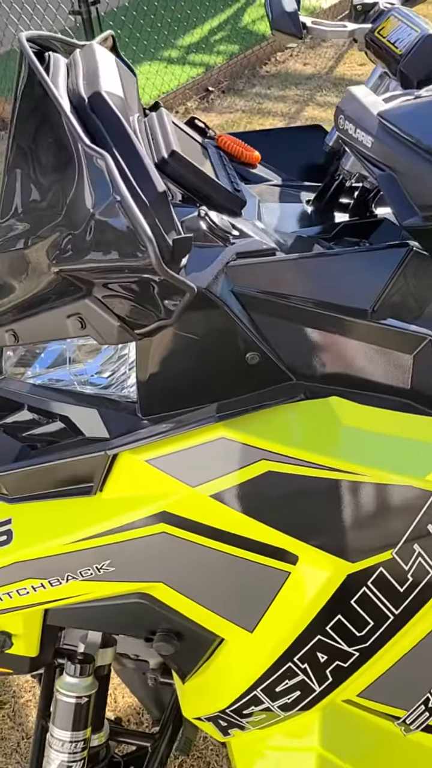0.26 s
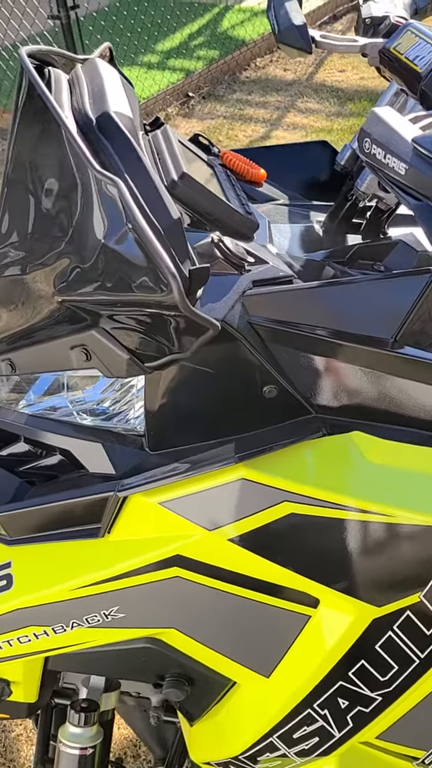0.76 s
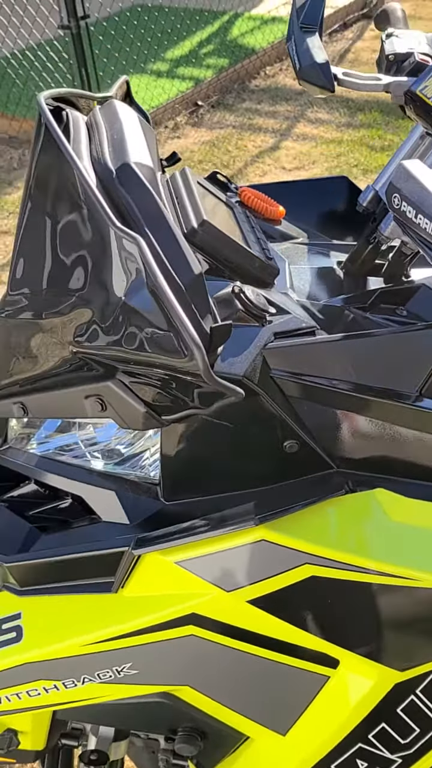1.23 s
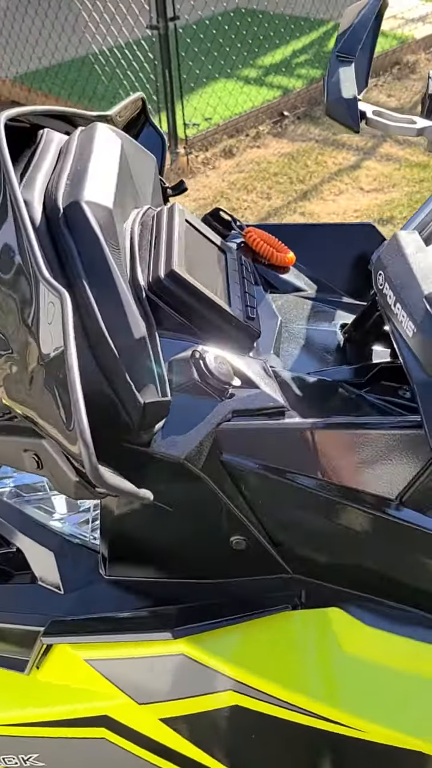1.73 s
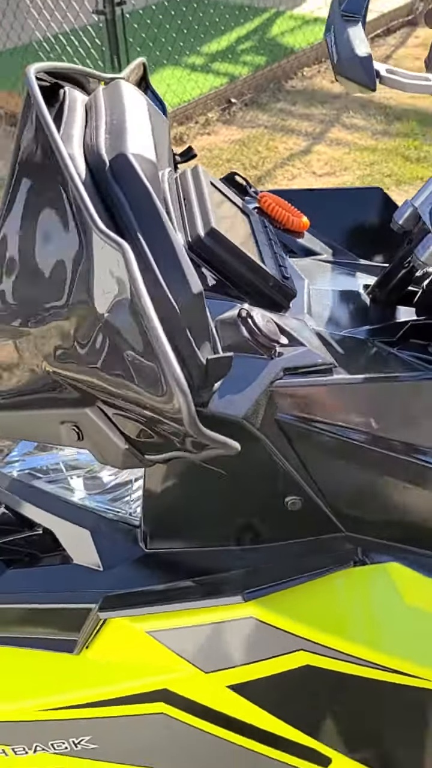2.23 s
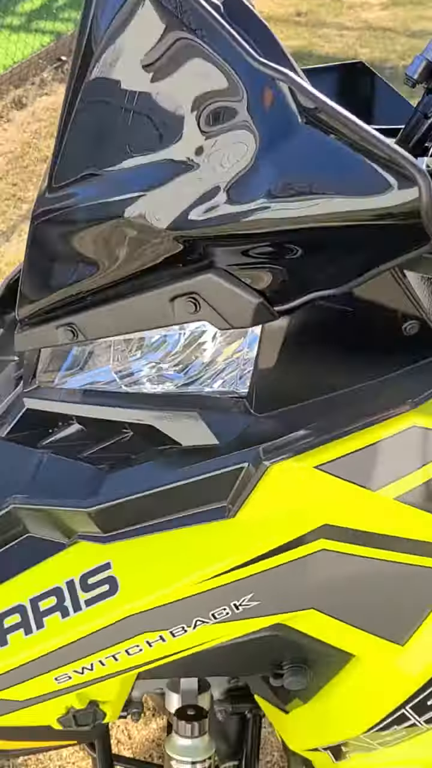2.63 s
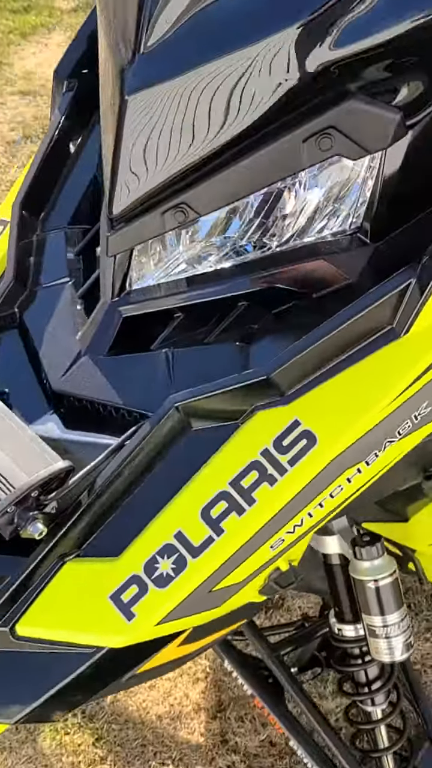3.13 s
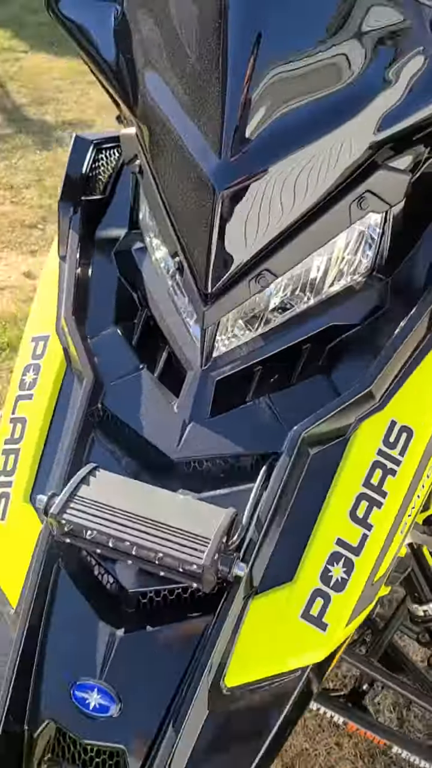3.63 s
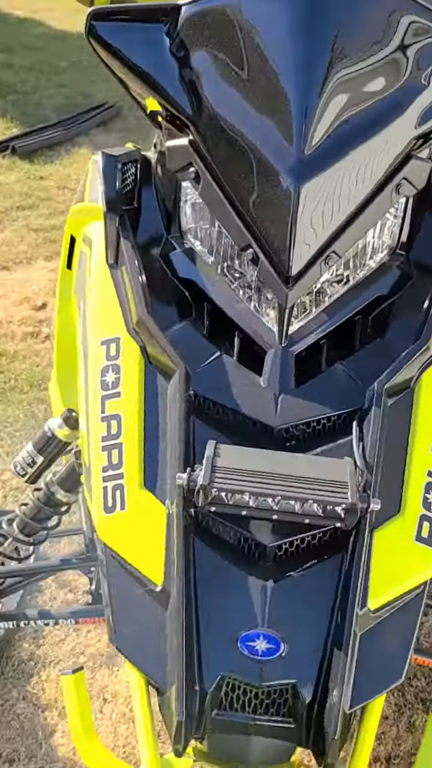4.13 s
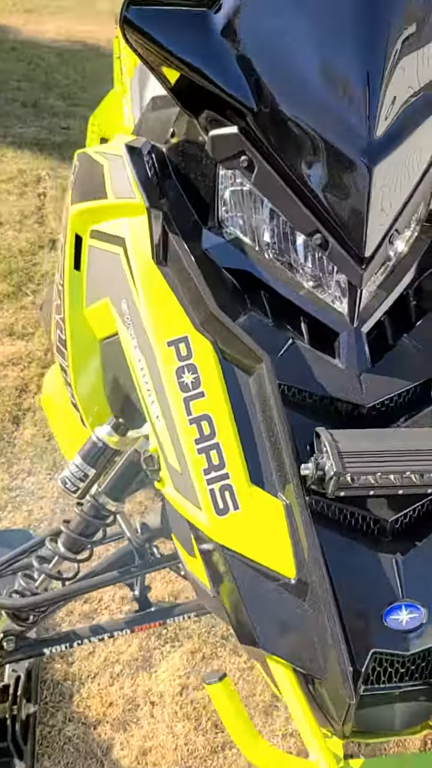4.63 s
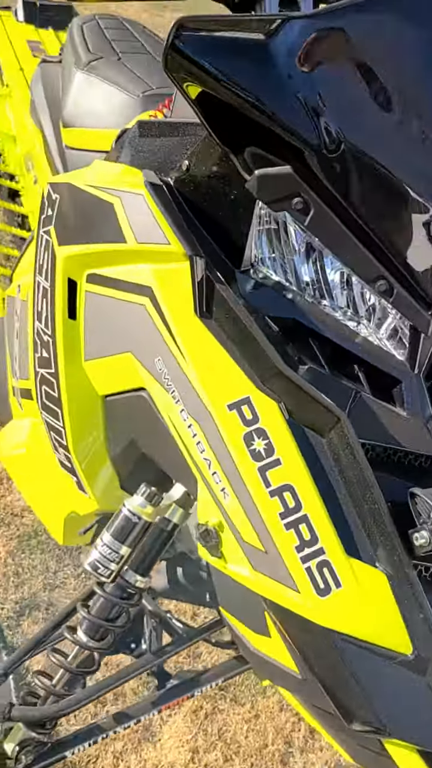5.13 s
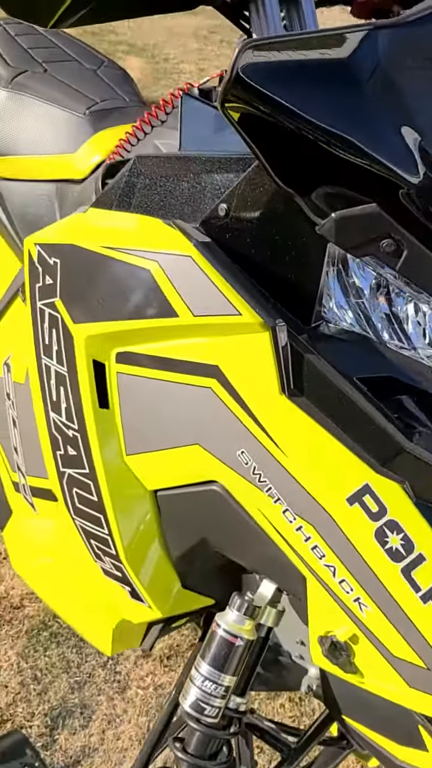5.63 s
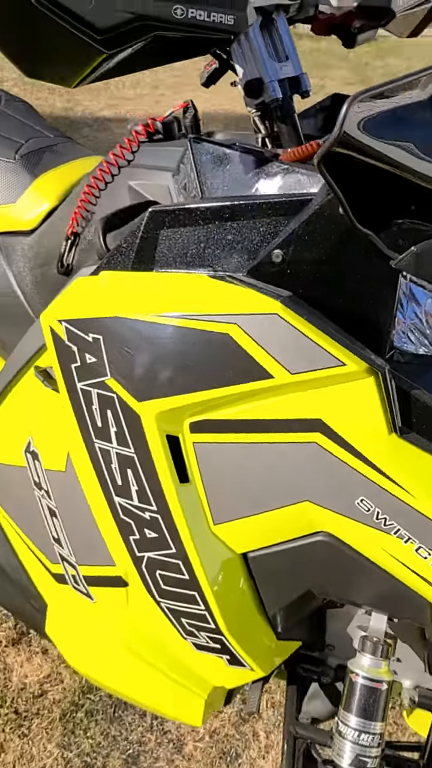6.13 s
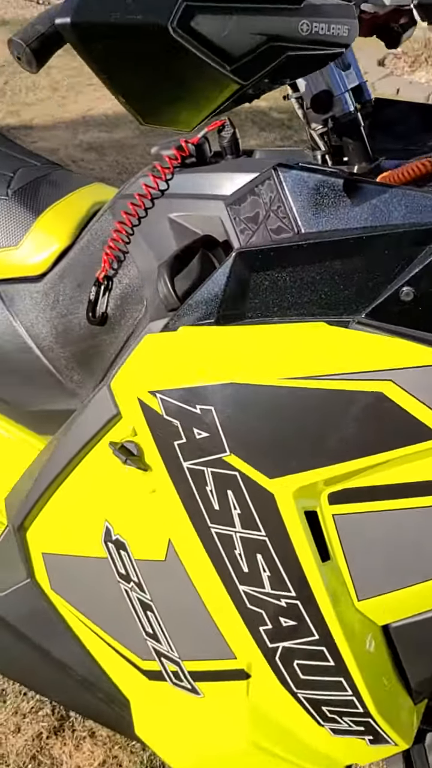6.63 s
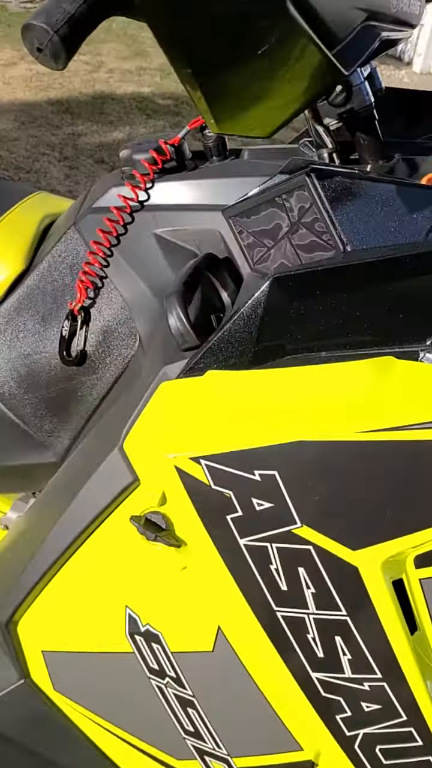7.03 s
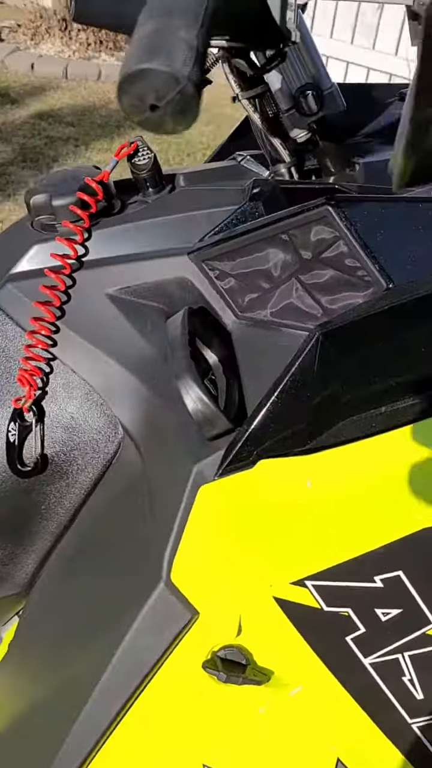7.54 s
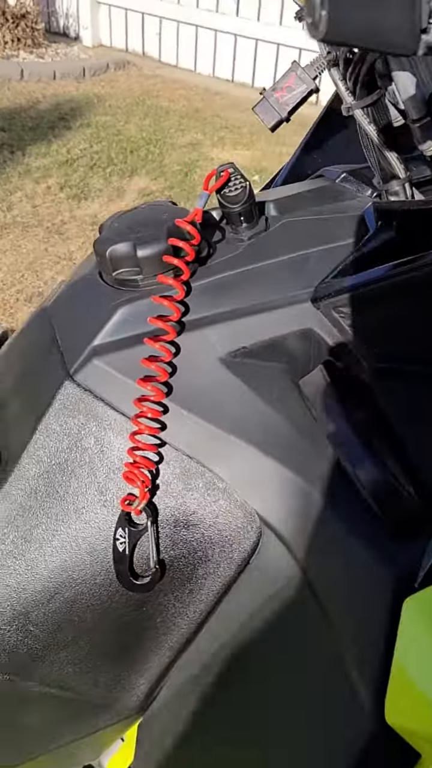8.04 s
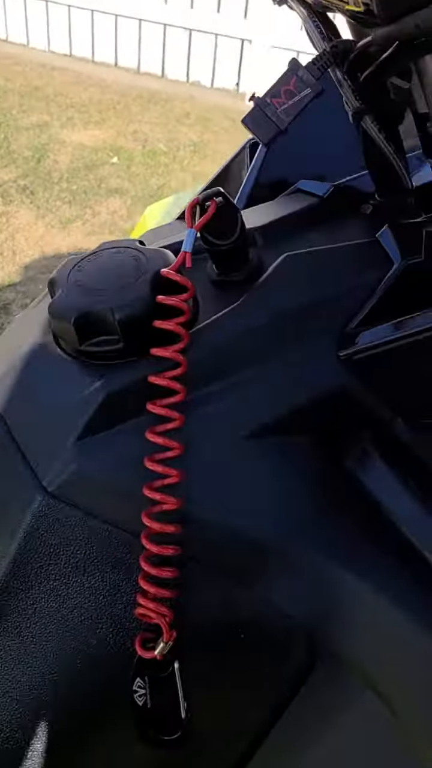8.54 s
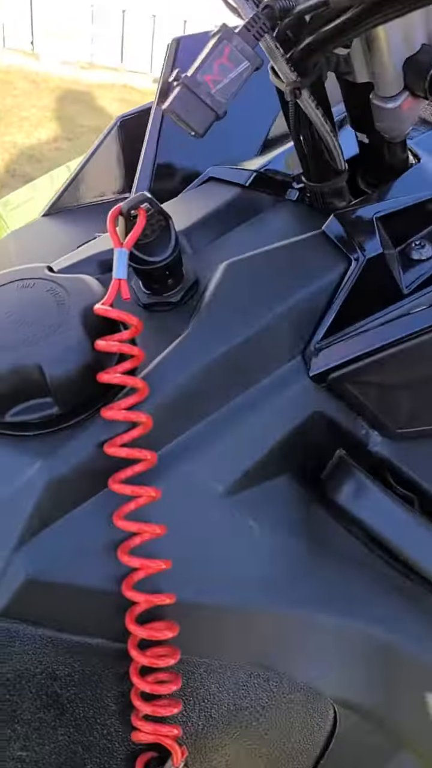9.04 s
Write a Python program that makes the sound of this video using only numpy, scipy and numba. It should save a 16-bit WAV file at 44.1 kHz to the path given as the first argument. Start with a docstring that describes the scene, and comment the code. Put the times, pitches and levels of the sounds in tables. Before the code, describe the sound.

Continuous close stereo sound of a snowmobile engine idling outdoors without revving. Uneven firing gives a lumpy, sputtering pop-pop over a droning exhaust hum, with hollow metallic ringing, fast intake knocks, gas hiss and rattling bodywork. As the microphone passes the front, knocks harden and hiss sharpens; later the sound turns duller and rounder, still idling when it cuts off.

```python
"""Snowmobile idling on grass

A two-cylinder two-stroke idles on grass while a stereo microphone is carried close round its nose.
The pistons pump the exhaust pipe into a steady hum; only some strokes fire, each with a pop, a puff of
hiss and a short collapse of the hum. The intake knocks once a turn, now hard, now airy; gas hisses and
whistles, and the engine bay rumbles and rattles behind it all. The walk is heard as slow changes of level.
"""
import sys
import numpy as np
from scipy import signal
from scipy.io import wavfile
from numba import njit

SR = 44100
rng = np.random.default_rng(int(sys.argv[2]) if len(sys.argv) > 2 else 0)


def transcribe(signal):
    """Save signal, clipped to [-1, 1], as a 16-bit WAV file at the path in sys.argv[1]."""
    frames = np.atleast_2d(signal).T
    limited = np.clip(frames, -1, 1)
    pcm = np.round(limited * 32767).astype(np.int16)
    wavfile.write(sys.argv[1], SR, pcm)


N = 408807

# Strokes that fire, with relative strengths: start_s, pop_db, puff_db (hiss), crack_db
FIRINGS = [(0.0789, 1.5, -34, -28), (0.1254, 4.5, -28.5, -22), (0.1992, 0.5, -36, -29),
           (0.2732, 3, -28.5, -26), (0.3179, -1, -35, -33), (0.3949, -13, -38, -23), (0.425, 3, -29.5, -19),
           (0.441, 0.5, -37, -31), (0.5471, -4, -27, -23), (0.5634, -2, -51, -40), (0.5948, -4, -41, -42),
           (0.643, -9, -32.5, -22), (0.689, -9, -42, -26), (0.7213, -4, -42, -36),
           (0.7378, 3.5, -28, -19.5), (0.784, -6, -43, -39), (0.8609, 1.5, -26.5, -27),
           (0.8766, -1.5, -45, -41), (0.9068, -4, -43, -40), (0.9834, -1, -26, -24), (1.031, 5.5, -29, -27),
           (1.0756, 1, -29.5, -34), (1.1529, -2.5, -35, -21), (1.199, 2, -26.5, -19.5),
           (1.2443, -1, -38, -36), (1.3188, 0.5, -28.5, -34), (1.3964, 4, -31.5, -26),
           (1.4119, -13, -36, -24), (1.4409, 2.5, -29, -27), (1.5456, 0.5, -37, -26),
           (1.5618, -7, -40, -26), (1.5909, -1, -31, -36), (1.6374, 1.5, -34, -20), (1.7394, 1, -28, -23),
           (1.7868, 0, -30, -25), (1.8297, -5, -33, -35), (1.935, 0, -29, -22), (1.95, 1.5, -30.5, -20),
           (2.0543, -10, -39, -23), (2.083, -22, -42, -37), (2.0993, -1.5, -24.5, -18),
           (2.2039, -4, -47, -26), (2.2504, -5, -26.5, -24), (2.2932, 2.5, -29.5, -25),
           (2.3668, -5, -32, -42), (2.3966, -5, -44, -38), (2.4434, -6, -42, -28), (2.488, -1, -27.5, -24),
           (2.5326, -0.5, -34, -16.5), (2.576, 3, -27.5, -18), (2.709, 5.5, -28, -37),
           (2.725, -4, -27, -18), (2.8493, 4, -25, -29), (2.8652, 0, -46, -36), (2.9419, -9, -33, -31),
           (2.974, -18, -36, -29), (2.9898, 4, -31, -25), (3.034, 1, -31, -31), (3.1104, -10, -43, -43),
           (3.143, -3, -29, -40), (3.158, 6, -25, -24), (3.2836, 5, -21, -26), (3.299, -3, -56, -34),
           (3.3305, 3, -31, -42), (3.3757, -3, -27, -17), (3.4537, -13, -42, -30),
           (3.4849, 1, -30.5, -24.5), (3.5013, -5, -37, -21), (3.5308, 1, -26.5, -26),
           (3.607, -8, -36, -25), (3.6385, 2, -32, -29), (3.6545, 1, -27.5, -23), (3.7313, -10, -37, -25),
           (3.763, -8, -30, -19), (3.7787, 0, -31, -24), (3.871, -2, -27.5, -23), (3.8872, 4, -30, -21),
           (3.9328, -4, -30, -38), (4.0108, -5, -33, -24), (4.026, -4, -42, -29), (4.0577, -6, -28.5, -24),
           (4.1026, 3.5, -28, -24), (4.176, 0.5, -25, -19), (4.2522, 1, -30, -26), (4.295, 3.5, -27, -34),
           (4.4264, 1.5, -25, -21), (4.4421, 0.5, -28.5, -38), (4.5581, -9, -26.5, -19),
           (4.5743, -1, -36, -23), (4.6181, -5, -31, -33), (4.6933, 1.5, -32, -21), (4.7079, -12, -33, -22),
           (4.737, 2, -27.5, -43), (4.8701, -1, -30, -15), (4.885, 2, -28, -16), (5.005, -2, -24.5, -19),
           (5.0209, -5, -53, -32), (5.049, -5, -37, -36), (5.0957, 1.5, -25.5, -20), (5.1704, -7, -42, -41),
           (5.2013, -14, -44, -34), (5.2485, 1.5, -25.5, -17), (5.2935, -0.5, -29.5, -20),
           (5.3392, -3, -32, -33), (5.3686, -13, -36, -36), (5.4447, 4, -31, -17), (5.4602, -3, -33, -18),
           (5.5527, -15, -35, -25), (5.6004, 0, -27, -15), (5.6448, -1.5, -31.5, -19),
           (5.7189, -5, -38, -29), (5.75, -11, -35, -22), (5.795, 1, -26, -18), (5.8688, -7, -36, -21),
           (5.9146, 0.5, -28.5, -20), (5.9606, -2, -33, -18), (6.0043, 2, -28, -14.5),
           (6.1092, -2.5, -34, -20), (6.155, 2.5, -25, -16), (6.2596, 1.5, -34, -20),
           (6.3037, 4.5, -26.5, -22), (6.4358, 2.5, -36, -24), (6.453, -7, -31, -27), (6.5293, 5, -32, -32),
           (6.5446, -4, -35, -15.5), (6.574, 2.5, -30.5, -35), (6.6777, 4, -32, -20), (6.7232, 3, -26, -17),
           (6.8248, -2, -33, -19), (6.8703, 4, -27, -15), (6.915, 4.5, -29.5, -19), (7.0154, 4.5, -26, -18),
           (7.0896, 3.5, -29, -18), (7.133, 4.5, -26.5, -17), (7.267, 2.5, -33, -18), (7.283, -3, -33, -27),
           (7.3125, 2.5, -33, -31), (7.4177, -2, -38, -32), (7.449, -9, -37, -33), (7.4642, 4.5, -29, -33),
           (7.5697, 0.5, -30, -18), (7.615, 3.5, -27, -21), (7.658, -1.5, -44, -33), (7.7332, -1, -29, -22),
           (7.779, 3.5, -29.5, -26), (7.8224, 4, -28, -24), (7.926, -10, -39, -42), (7.9714, 1.5, -27, -25),
           (8.0162, 1, -32, -24), (8.1218, 2, -25.5, -25), (8.17, 0, -33, -30), (8.2424, -8, -41, -42),
           (8.2728, 0.5, -34, -27), (8.3179, 1.5, -31, -36), (8.395, -1, -27, -42), (8.473, 2.5, -31, -31),
           (8.5197, 4.5, -28.5, -33), (8.6251, 2, -35, -35), (8.6717, 2.5, -25, -23),
           (8.746, -16, -43, -47), (8.7775, 1.5, -36, -35), (8.8232, 3, -26.5, -22), (8.8973, 0, -33, -29),
           (8.9423, 2, -25, -24), (9.0168, 2, -31.5, -28), (9.0632, 2, -26.5, -23),
           (9.1679, 1.5, -31.5, -26), (9.2128, 3.5, -28.5, -32)]
IDLE_STROKES_PER_S = 66.4   # nominal, two strokes a turn


def crank():
    """Crank angle in turns: a whole number of strokes fits between two firings."""
    start_s = np.array(FIRINGS)[:, 0]
    strokes = np.r_[0, np.cumsum(np.round(np.diff(start_s) * IDLE_STROKES_PER_S))]
    # one more second at nominal speed on either side
    knots_s = np.r_[start_s[0] - 1, start_s, start_s[-1] + 1]
    strokes = np.r_[-IDLE_STROKES_PER_S, strokes, strokes[-1] + IDLE_STROKES_PER_S]
    return np.interp(np.arange(N) / SR, knots_s, strokes / 2)


def passes(turns, angle, per_turn=1):
    """Times in s at which the crank passes an angle in turns."""
    return np.flatnonzero(np.diff(np.floor((turns - angle) * per_turn)) > 0) / SR


# Orders of the pumping hum: multiple of crank speed, level_db (relative), left_over_right_db
HUM_ORDERS = [(2, -20, -4), (4, 2, -1), (6, -16.5, 9)]
HUM_DB, HUM_LAG_TURNS = -11.5, .026
SING_ORDER, SING_LAG_TURNS = 12, .062
REBUILD_DEPTH, REBUILD_S = 0.27, 0.046   # the hum needs some strokes to reach full height again


def hum(turns, drone_db, sing_db):
    """Pumping orders; the returning wave of a firing knocks the hum down and the next strokes rebuild it."""
    start_s, pop_db = np.transpose(FIRINGS)[:2]
    pop = from_db(pop_db)
    knocked_down = swell(clicks(start_s + .0095, 3.24 * pop), rise_s=0.0025, fall_s=0.0076)
    rebuilding = swell(clicks(start_s + 0.0107, REBUILD_DEPTH * pop), rise_s=0.0022, fall_s=REBUILD_S)
    collapse = np.exp(-knocked_down) * np.exp(-rebuilding)
    tone = 0
    for order, level_db, side_db in HUM_ORDERS:
        wave = np.cos(2 * np.pi * order * (turns - HUM_LAG_TURNS))
        tone = tone + pan(from_db(level_db + 0.8 * drift(22)) * wave, side_db)
    # one high order sits on a silencer mode and sings; it dies a little later than the hum
    fading = np.exp(-swell(clicks(start_s + 0.0164, 3 * pop), rise_s=0.0013, fall_s=0.003))
    sing_wave = np.cos(2 * np.pi * SING_ORDER * (turns - SING_LAG_TURNS))
    sing = fading * from_db(sing_db + 2 * drift(5.6)) * sing_wave
    # the eighth order sits on the lower mode and drones on, barely shaken by a firing
    drone_wave = np.cos(2 * np.pi * 8 * (turns - HUM_LAG_TURNS))
    drone = collapse ** 0.047 * from_db(drone_db + 1.0 * drift(4.2)) * drone_wave
    return np.sqrt(2) * (from_db(HUM_DB) * collapse * tone + pan(sing + drone, 0.34))


# Pulses in the tuned pipe: blow-down, its inverted return from the widening cone, its return from the
# closing cone: delay_s (to the pulse's middle), gain, width_s
PIPE_PULSES = [(.002, 0.16, 0.0025), (.0058, -0.21, 0.0018), (0.0103, 0.47, 0.0044)]


def pops():
    """Each firing sends a smooth pressure pulse down the pipe; the cones send it back."""
    start_s, pop_db = np.transpose(FIRINGS)[:2]
    out = 0
    for delay_s, gain, width_s in PIPE_PULSES:
        pulse = np.hanning(int(width_s * SR))
        out = out + gain * signal.fftconvolve(clicks(start_s + delay_s, from_db(pop_db)), pulse, "same")
    return pan(out, -2.5)


# Silencer and chassis modes: pitch_hz, firing_db, idle_stroke_db (both relative), t60_s, left_over_right_db
SILENCER_MODES = [(75.2, -57, -57, 0.026, 5), (203.6, -25.5, -37, 0.067, 14), (270.6, -23.5, -32, 0.042, 3),
                  (379.6, -25, -29, 0.17, -3), (395.8, -53, -35, 0.22, -10.5),
                  (558, -102, -41.5, 0.039, -18), (695, -33, -35, 0.042, 2), (787, -28, -35, 0.042, -2),
                  (1132, -31.5, -45, 0.015, 4), (1434, -30, -53, 0.01, -9)]


def silencer(turns, low_db, high_db):
    """Firings and idle strokes both strike the ringing modes, each with a strength of its own."""
    start_s, pop_db, _, crack_db = np.transpose(FIRINGS)
    idle_s = passes(turns, .06, per_turn=2)
    out, arrival_s = 0, start_s + .0019
    for hz, fire_db, idle_db, t60_s, side_db in SILENCER_MODES:
        # low modes follow the pop, high ones the crack
        strength_db = pop_db if hz < 600 else crack_db - np.mean(crack_db)
        fire_levels_db = strength_db + fire_db + rng.normal(0, 1.2, len(start_s))
        blows = clicks(arrival_s, from_db(fire_levels_db))
        jittered_s = idle_s + rng.normal(0, 0.00045, len(idle_s))
        blows += clicks(jittered_s, from_db(idle_db + rng.normal(0, 2.7, len(idle_s))))
        # two groups of modes change with the microphone's place
        place_db = low_db if 150 < hz < 320 else high_db if 320 < hz < 600 else 0
        out = out + pan(from_db(place_db - np.mean(place_db)) * ring(blows, hz, t60_s), side_db)
    return out


# The walk past the air box: time_s, knock_db, knock_pitch_hz, overtone_db, airiness (0-1),
# hood_boom_db, left_over_right_db
INTAKE_WALK = [(0, -39.5, 1390, -54, 0.33, -38.5, 8), (1.2, -37.5, 1385, -48, 0.72, -35.5, 2.5),
               (2.5, -40, 1353, -43, 0.68, -36, 1), (2.76, -35.5, 1457, -38, 0.59, -31.5, -5),
               (2.86, -30, 1490, -36, 0.34, -27.5, -4), (3.12, -32.5, 1455, -53, .32, -28, -8),
               (3.33, -37.5, 1410, -62, 0.48, -32.5, -4), (4.0, -35.5, 1296, -51, 0.74, -54, -3.5),
               (4.35, -34, 1255, -52, 0.77, -48, -1), (5.06, -31.5, 1470, -38, 0.49, -35, 5),
               (5.34, -30, 1516, -42.5, 0.56, -37, -1), (5.78, -33.5, 1603, -40, 0.17, -49, -5),
               (6.48, -34.5, 1575, -43, 0.33, -40, -3.5), (7.15, -43, 1624, -52, 0.27, -42, 3),
               (7.5, -37.5, 1610, -60, .08, -45, -1), (7.85, -43, 1590, -61, 0.34, -54, 1),
               (8.05, -56, 1400, -109, 0.33, -75, 1), (9.27, -51, 1296, -75, 0.3, -50, 1)]
KNOCK_AT, BOOM_AT, SECOND_AT = .35, .395, .54   # crank angles of the contacts, turns
SECOND_KNOCK_DB = -13.5   # relative to the first knock
KNOCK_WIDTH_HZ, OVERTONE_HZ, OVERTONE_WIDTH_HZ, AIR_BOX_CUT_HZ = 270, 2140, 330, 2400
BOOM_HZ, BOOM_WIDTH_HZ = 755, 160
# two opposed resonances, this far below and above the centre, give the boom a steep-edged band
BOOM_SPLIT_HZ = 75


def intake(turns):
    """Contacts strike the air box and hood; along the walk the knocks vary from hard blows to airy puffs."""
    knock_db, knock_hz, overtone_db, airy, boom_db, side_db = in_time(INTAKE_WALK)
    # reed and injector contacts
    contacts = []
    for angle in (KNOCK_AT, BOOM_AT, SECOND_AT):
        times_s = passes(turns, angle)
        contacts.append(clicks(times_s, from_db(rng.normal(0, 1.5, len(times_s)))))
    first, boom, second = contacts
    knock = first + from_db(SECOND_KNOCK_DB) * second
    airy = np.clip(airy, 0, 1)
    channels = []
    for air in rng.standard_normal((2, N)):
        puff = rms_one(swell(knock, rise_s=0.00088, fall_s=0.01) * air)
        blow = (1 - airy) * rms_one(knock) + airy * puff
        thud_air = rms_one(swell(boom, rise_s=.001, fall_s=.006) * air)
        thud = .85 * rms_one(boom) + .15 * thud_air
        hood = sum(k * twice(thud, BOOM_HZ + k * BOOM_SPLIT_HZ, BOOM_WIDTH_HZ) for k in (-1, 1))
        channels.append(from_db(knock_db) * twice(blow, knock_hz, KNOCK_WIDTH_HZ)
                        + from_db(overtone_db) * twice(blow, OVERTONE_HZ, OVERTONE_WIDTH_HZ)
                        + from_db(boom_db) * rms_one(hood))
    air_box = signal.butter(4, AIR_BOX_CUT_HZ, fs=SR, output="sos")
    return signal.sosfilt(air_box, channels) * pan(1, side_db)


# Colour of the gas jet: pitch_hz, density_db (per Hz, relative)
JET_COLOUR = [(1470, -47), (2500, -3.5), (3200, -7), (3880, -9.5), (5210, -7), (6030, -3.5), (8470, -4),
              (9960, -5), (11500, -3.5), (12600, -2.5), (13400, 3), (15100, 4.5), (15800, -16)]
# Broad jet whistles: pitch_hz, width_hz (of each resonance pass), level_db (relative to the vents' level)
WHISTLES = [(6140, 1300, 0.5), (11900, 2200, 5)]
# The walk past the nose vents: time_s, whistle_level_db
VENTS_WALK = [(0, -78), (1.9, -66), (2.6, -67), (3.1, -72), (3.35, -51), (4.0, -47.5), (4.3, -47.5),
              (4.5, -51.5), (5.8, -53), (7.1, -58), (8.0, -59), (9.27, -56.5)]
# The thin whistle along the walk: time_s, level_db
THIN_WALK = [(0, -57), (2.6, -56), (2.85, -42), (3.1, -43.5), (4.0, -43), (4.4, -45), (6.5, -57),
             (9.27, -73)]
LEAK_DB, LEAK_FOLLOWS = -44.5, 0.07   # hiss at mean whistle level; share of the whistles' swing in dB
THIN_HZ, THIN_WIDTH_HZ = 13310, 220
THIN_PUFF_SHARE = 1   # how far the thin whistle follows the flow with its puffs


def hiss(turns):
    """Gas jet: a steady leak that breathes with the crank, a puff round every firing, and whistles."""
    start_s, _, puff_db, _ = np.transpose(FIRINGS)
    (whistle_db,), (thin_db,) = in_time(VENTS_WALK), in_time(THIN_WALK)
    steady_db = LEAK_DB + LEAK_FOLLOWS * (whistle_db - whistle_db.mean())
    jet = banded_noise(JET_COLOUR, 2200 * 2 ** np.arange(0, 3.1, .33), patchy_db=3.0)
    air = rng.standard_normal((2, N))
    whistles = 0
    for hz, width_hz, level_db in WHISTLES:
        gain = from_db(level_db + 2.0 * drift(7.5))
        whistles = whistles + gain * np.array([twice(n, hz, width_hz) for n in air])
    thin_gain = from_db(thin_db + 3.7 * drift(25))
    thin = thin_gain * np.array([twice(n, THIN_HZ, THIN_WIDTH_HZ) for n in air])
    breath_db = 0.25 * np.cos(2 * np.pi * (turns - .4)) + 0.45 * drift(26.4)
    breath = from_db(steady_db + breath_db)
    puffs = swell(clicks(start_s - .003, from_db(puff_db + 3.5)), rise_s=0.0053, fall_s=0.006)
    flow = np.sqrt(breath ** 2 + puffs ** 2)
    jet_and_whistles = jet + from_db(whistle_db - steady_db) * whistles
    return jet_and_whistles * flow + thin * rms_one(flow ** THIN_PUFF_SHARE)


# Colour of the engine bay's rumble and rattle: pitch_hz, density_db (per Hz, relative)
BAY_COLOUR = [(25, -32), (60, -6.5), (110, 4), (170, -12), (300, -11.5), (450, -14.5), (750, -22),
              (1000, -18), (1500, -19.5), (2200, -42.5), (3500, -28), (5000, -61)]
# The rattle along the walk: time_s, level_db (over the rumble's colour)
RATTLE_WALK = [(0, 0.9), (2.5, 1.5), (4.5, 2), (7.2, 0), (9.27, 0.5)]
BAY_DB = -25
RATTLE_ABOVE_HZ, RATTLE_SWING_DB, RATTLE_AT = 1160, 1.5, 0.39   # loudest at this crank angle, turns


def bay(turns):
    """Engine bay: a steady noise rumble, and a rattle above it that swells once a turn."""
    noise = banded_noise(BAY_COLOUR, 22 * 2 ** np.arange(0, 8, .6), patchy_db=2.0)
    high_pass = signal.butter(1, RATTLE_ABOVE_HZ, "high", fs=SR, output="sos")
    rattle = signal.sosfilt(high_pass, noise)
    rumble = noise - rattle
    swing_db = RATTLE_SWING_DB * np.cos(2 * np.pi * (turns - RATTLE_AT))
    return from_db(BAY_DB) * (rumble + rattle * from_db(in_time(RATTLE_WALK)[0] + swing_db))


# How alike noise is in the two channels: pitch_hz, likeness (correlation, -1 to 1)
LIKENESS = [(60, 0.85), (180, 0.91), (550, 0.15), (1650, -0.066), (4970, -0.061), (15000, -0.038)]


def banded_noise(spectrum, edges, patchy_db):
    """Bands of stereo noise, each with its own level, flicker and likeness; rms 1."""
    out, white = 0, rng.standard_normal((2, 2, N))
    for k, (low, high) in enumerate(zip(edges, edges[1:])):
        band = signal.butter(2, [low, high], "band", fs=SR, output="sos")
        mid, side = signal.sosfilt(band, white[k % 2])   # neighbouring bands use different noise
        hz = np.sqrt(low * high)
        alike = np.clip(at_hz(LIKENESS, hz), -1, 1)
        gain = from_db(at_hz(spectrum, hz) + patchy_db * drift(18.2))
        out = out + gain * (np.sqrt(1 + alike) * mid + np.sqrt(1 - alike) * side * [[1], [-1]])
    return rms_one(out)


def from_db(db):
    """Gain of a level in dB."""
    return 10 ** (np.asarray(db) / 20)


def rms_one(x):
    """Scaled to rms 1."""
    return x / np.sqrt(np.mean(x ** 2) + 1e-20)


def pan(x, db):
    """Two channels, the left louder by db."""
    return np.array([x * from_db(db / 2), x * from_db(-db / 2)])


def at_hz(points, hz):
    """A spectrum read on a log-frequency axis."""
    points = np.array(points)
    return np.interp(np.log(hz), np.log(points[:, 0]), points[:, 1])


def in_time(rows):
    """The columns of a table, joined by straight lines in time."""
    time_s, *columns = np.transpose(rows)
    return [np.interp(np.arange(N) / SR, time_s, c) for c in columns]


def drift(rate_hz):
    """Slow chance of spread 1: noise through two equal low-pass poles, made at every 40th sample."""
    r = np.exp(-2 * np.pi * rate_hz * 40 / SR)
    noise = rng.standard_normal(N // 40 + 2002)
    slow = signal.lfilter([1], [1, -2 * r, r * r], noise)[2000:]   # skips the filter's start
    return np.interp(np.arange(N) / 40, np.arange(len(slow)), rms_one(slow))


def clicks(times_s, sizes):
    """One-sample clicks of the given sizes."""
    out = np.full(N, 1e-18)   # a trace above zero keeps filters off denormal numbers
    at = np.round(np.asarray(times_s) * SR).astype(int)
    np.add.at(out, np.clip(at, 0, N - 1), sizes)
    return out


def ring(x, hz, t60_s):
    """A unit click sets a decaying sine of starting height 1 ringing."""
    r, w = from_db(-60 / (t60_s * SR)), 2 * np.pi * hz / SR
    return signal.lfilter([0, np.sin(w)], [1, -2 * r * np.cos(w), r * r], x)


def swell(x, rise_s, fall_s):
    """Each click becomes a hump, lower than the click unless the fall is much slower than the rise."""
    a, b = np.exp(-1 / (rise_s * SR)), np.exp(-1 / (fall_s * SR))
    return signal.lfilter([1 - a], [1, -a - b, a * b], x)


@njit
def resonance(x, hz, width_hz, rate):
    """Two-pole resonance whose centre may move."""
    out, r = np.zeros(len(x)), np.exp(-np.pi * width_hz / rate)
    for i in range(2, len(x)):
        feedback = 2 * r * np.cos(2 * np.pi * hz[i] / rate) * out[i - 1] - r * r * out[i - 2]
        out[i] = x[i] - x[i - 2] + feedback
    return out


def twice(x, hz, width_hz):
    """A steep resonance of two equal passes, rms 1."""
    hz = hz * np.ones(N)
    once = resonance(x, hz, width_hz, SR)
    return rms_one(resonance(once, hz, width_hz, SR))


# The walk past the silencer: time_s, low_ring_db, high_ring_db
RINGS_WALK = [(0, -35.5, -30.5), (1.2, -30, -29), (1.9, -33.5, -33), (2.6, -29.5, -28), (3.1, -32, -26.5),
              (3.35, -28.5, -29), (4.0, -27, -31), (4.3, -32.5, -36.5), (5.06, -24.5, -35), (5.8, -24, -29),
              (6.5, -27.5, -34), (7.1, -26, -36.5), (7.5, -26, -33), (8.05, -28.5, -29), (8.6, -26, -29),
              (9.27, -29, -30.5)]
DEAD_HZ, DEAD_WIDTH_HZ, DEAD_DEPTH = 167.4, 62, 0.81   # the silencer's side chamber swallows this band
LEFT_LAG = 5   # samples by which the engine reaches the left channel later


def scene():
    """All sources as the two microphone channels meet them."""
    turns = crank()
    low_db, high_db = in_time(RINGS_WALK)
    exhaust = hum(turns, low_db, high_db) + pops() + silencer(turns, low_db, high_db)
    dead_band = signal.iirpeak(DEAD_HZ, DEAD_HZ / DEAD_WIDTH_HZ, SR)
    exhaust -= DEAD_DEPTH * signal.lfilter(*dead_band, exhaust)
    engine = exhaust + intake(turns)
    engine[0] = np.r_[np.zeros(LEFT_LAG), engine[0, :-LEFT_LAG]]
    return engine + bay(turns) + hiss(turns)


CUTOFF_HZ = 15850


def record(dry):
    """The microphone drops the deepest bass, peaks are rounded, the top is cut."""
    x = signal.sosfilt(signal.butter(2, 36, "high", fs=SR, output="sos"), dry)
    x = 1.089 * np.tanh(x / 0.93)
    return signal.sosfilt(signal.ellip(14, .5, 75, CUTOFF_HZ, fs=SR, output="sos"), x)


dry = scene()
out = record(dry)
transcribe(out)
```